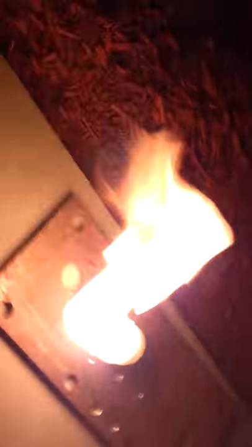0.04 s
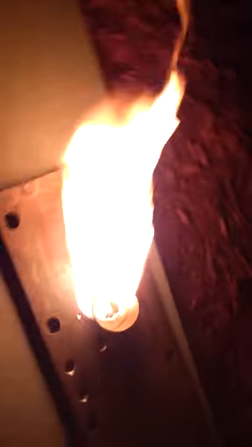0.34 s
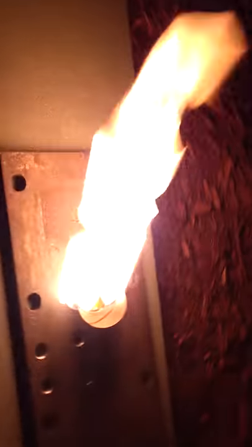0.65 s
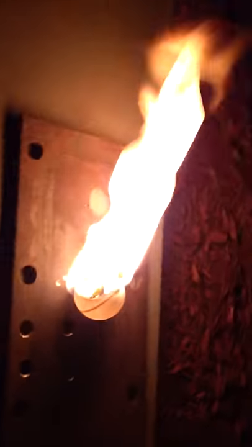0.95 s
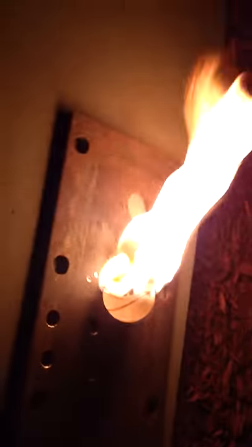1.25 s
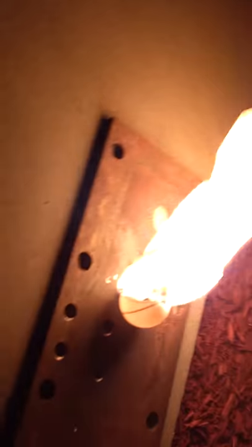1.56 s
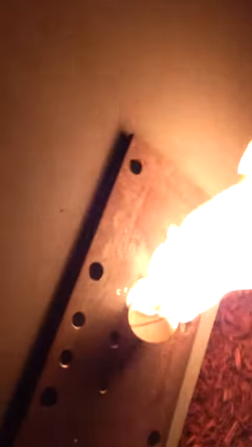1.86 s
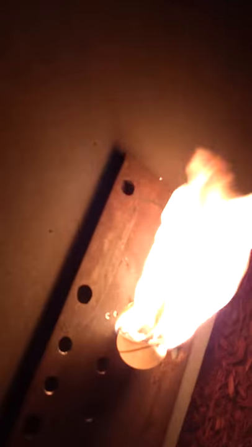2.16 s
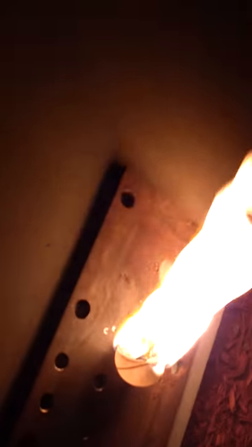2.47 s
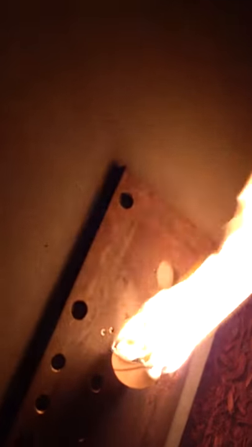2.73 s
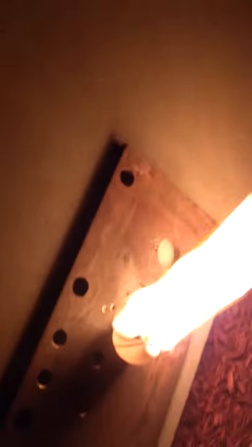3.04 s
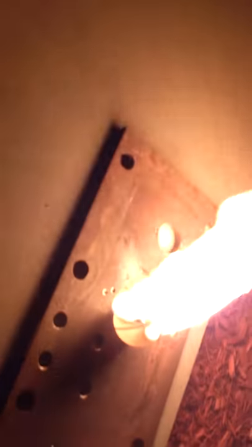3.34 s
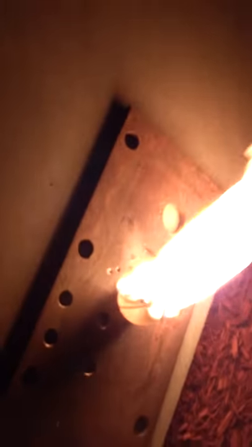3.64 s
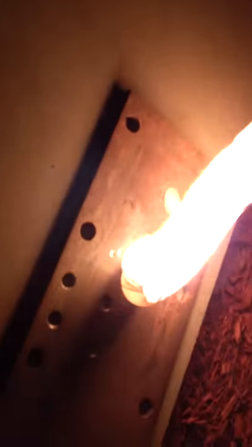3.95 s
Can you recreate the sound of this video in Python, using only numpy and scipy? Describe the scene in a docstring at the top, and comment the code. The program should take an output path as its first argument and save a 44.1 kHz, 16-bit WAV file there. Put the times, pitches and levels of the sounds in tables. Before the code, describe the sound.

A flame roars and hisses close up, with spitting crackles and a few handling knocks.

```python
"""Small ball burning on a board

Outdoors, close up: a fluttering roar and fine hiss over a low hum. Pockets of gas spit through the
first second, then the flame sinks and builds again with a faint whistle. A hand knocks and scuffs the
casing of the hand-held recorder, and something hollow and woody takes one padded blow. The recorder
widens its two close ports by feeding each, delayed and inverted, into the other side."""
import sys
import numpy as np
from scipy import signal
from scipy.fft import rfft, irfft
from scipy.io import wavfile

SR = 44100
rng = np.random.default_rng(int(sys.argv[2]) if len(sys.argv) > 2 else 0)


def dump(signal):
    """Clip the signal to [-1, 1] and save it as 16-bit WAV at the path in sys.argv[1]."""
    limited = np.clip(np.atleast_2d(signal).T, -1, 1)
    pcm = np.round(limited * 32767).astype(np.int16)
    wavfile.write(sys.argv[1], SR, pcm)


N = 176400
TIME = np.arange(N) / SR
FREQS = np.maximum(np.arange(N // 2 + 1) * SR / N, 1)
SIDES = np.array([[1], [-1]])  # left, right


def from_db(db):
    """Decibels to gain."""
    return 10 ** (np.asarray(db) / 20)


def unit_rms(x):
    """Scale to rms 1."""
    return x / np.sqrt(np.mean(x ** 2) + 1e-20)


def automation(rows):
    """One curve for each column after the time, at every sample."""
    times, *columns = np.transpose(rows)
    return [np.interp(TIME, times, column) for column in columns]


def over_freqs(points):
    """Draw a curve across the spectrum on a log-frequency axis."""
    hz, values = np.transpose(points)
    return np.interp(np.log(FREQS), np.log(hz), values)


def panned(db):
    """Stereo gains that put the left db above the right."""
    return from_db(.5 * SIDES * db)


def drift(rate_hz):
    """Smooth random modulator of rms 1."""
    return unit_rms(irfft(rfft(rng.standard_normal(N)) / (1 + (FREQS / rate_hz) ** 2), N))


def decay(t, t60):
    """One until time zero, then an exponential fall."""
    return np.exp(-np.log(1000) * np.clip(t / t60, 0, 10))


def ring(clicks, hz, t60):
    """A unit click sets a sine of height 1 ringing."""
    radius, angle = np.exp(-np.log(1000) / (t60 * SR)), 2 * np.pi * hz / SR
    return signal.lfilter([0, np.sin(angle)], [1, -2 * radius * np.cos(angle), radius ** 2], clicks + 1e-18)


def sharp_click(gains):
    """The shortest click with this spectrum, starting at time zero; energy 1."""
    cepstrum = irfft(np.log(gains + 1e-6), N)
    click = irfft(np.exp(rfft(2 * cepstrum[:N // 2], N)), N)
    return click / np.sqrt(np.sum(click ** 2))


def narrow_noise(hz, width_hz):
    """Noise in one resonance, which may glide; rms 1."""
    phase = 2 * np.pi * np.cumsum(hz * np.ones(N)) / SR
    return unit_rms(drift(width_hz) * np.cos(phase) + drift(width_hz) * np.sin(phase))


# Stereo focus of the noise: f/Hz, left-right correlation (clipped to +-1)
IMAGE_FOCUS = [(30, -0.5), (80, -0.47), (170, 2.4), (350, 0.5), (700, 0.5), (1300, -0.16), (2500, -0.09),
               (14000, 0)]
# Phase skew: f/Hz, left lead/rad
IMAGE_LEAD = [(30, -4), (70, -0.7), (150, -1), (350, 0.5), (700, -.5), (1300, -2.5), (3000, -0.5)]
# Balance: f/Hz, left minus right/dB
IMAGE_PAN = [(30, 7.5), (150, -12.5), (350, -4.5), (850, -2), (1550, -5.5), (2050, -4), (4000, 3.5),
             (8000, -2.5), (11000, -2.5), (14000, -7)]
def noise_spectrum(eq):
    """Spectrum of equalised noise with the flame's stereo image."""
    mid, side = rfft(rng.standard_normal((2, N)))
    focus = np.clip(over_freqs(IMAGE_FOCUS), -1, 1)
    pair = np.sqrt(1 + focus) * mid + np.sqrt(1 - focus) * side * SIDES
    skew = np.exp(.5j * SIDES * over_freqs(IMAGE_LEAD))
    return pair * from_db(over_freqs(eq)) * panned(over_freqs(IMAGE_PAN)) * skew


def turbulence(eq, flutter_db):
    """Noise whose ten octaves swell together and flutter apart; rms 1."""
    spectrum, swell, out = noise_spectrum(eq), drift(rate_hz=7.5), 0
    octave = np.clip(np.log2(FREQS / 32), 0, 9)
    for k in range(10):
        band = irfft(spectrum * np.maximum(1 - abs(octave - k), 0), N)
        out += band * from_db(flutter_db * (.5 * swell + drift(rate_hz=11.6)))
    return unit_rms(out)


# Fader ride of the roar, before trim: t/s, level/dB
ROAR_FADER = [(0, -34.5), (.19, -38.5), (.33, -34.5), (.52, -36.5), (.88, -35), (.99, -36.5), (1.07, -43.5),
              (1.4, -42), (1.8, -38), (2.4, -37.5), (3.1, -37), (3.55, -36), (4, -35.5)]
# Its dark tone: f/Hz, level/dB
ROAR_EQ = [(25, -3), (45, -11.5), (75, 5), (130, 0), (220, -1), (330, -4), (480, -2.5), (700, -1.5),
           (1000, -6), (1450, -12.5), (2000, -15), (2800, -32.5), (4500, -63), (16000, -64)]
def roar(trim_db=2.5):
    """The turbulent body of the flame sinks after a second and builds back."""
    return from_db(trim_db + automation(ROAR_FADER)[0]) * turbulence(ROAR_EQ, flutter_db=1)


# Fader ride of the hiss, before trim: t/s, level/dB
HISS_FADER = [(0.0, -48), (0.17, -51.5), (0.41, -51.5), (0.7, -53), (0.91, -47.5), (1.07, -57), (1.3, -58),
              (1.58, -57.5), (1.98, -53), (2.21, -54.5), (3.5, -54.5), (4.0, -53)]
# Its bright tone: f/Hz, level/dB
HISS_EQ = [(25, -41), (1500, -15.5), (2800, 7), (4000, -2.5), (5300, -4), (6700, -5.5), (9200, -5),
           (11000, -8.5), (15000, -15)]
def hiss(trim_db=3):
    """Fine turbulence gives the flame its top end, strongest in the first second."""
    return from_db(trim_db + automation(HISS_FADER)[0]) * turbulence(HISS_EQ, flutter_db=1.3)


# Two early surges of sizzle: t/s, level/dB
SIZZLE_FADER = [(0, -47), (.2, -48.5), (.3, -52.5), (.45, -78), (.7, -57), (.9, -48), (1.02, -53.5),
                (1.12, -57.5), (1.5, -70)]
def sizzle():
    """The flame sizzles in one narrow treble band, independent left and right."""
    band = np.array([narrow_noise(hz=3890, width_hz=720) for _ in range(2)])
    return from_db(automation(SIZZLE_FADER)[0]) * band


# Fader rides of the lower and upper hum tone, before trim: t/s, level/dB
LOW_HUM_FADER = [(0, -46.5), (.35, -41), (.58, -55), (.75, -38), (1.1, -54.5), (1.35, -47), (1.48, -39.5),
                 (1.8, -39), (2.02, -49), (2.3, -40), (2.6, -38), (2.8, -44), (3.0, -46.5), (3.2, -45.5),
                 (4, -42)]
HIGH_HUM_FADER = [(0, -42), (.2, -45), (.28, -37.5), (.45, -35), (.58, -46), (.7, -34), (.95, -36.5),
                  (1.1, -53.5), (1.3, -45.5), (1.55, -51.5), (2.08, -39.5), (2.55, -45), (2.9, -49.5),
                  (3.249, -43), (4, -54)]
# The two tones: f/Hz, pitch wander (twice its rms)/Hz, trim/dB, left lead/rad
HUM_VOICES = [(107.74, 3.94, 0.2, -1.27), (169.05, 3.45, 0.5, -0.89)]
def hum(waver_db=2.5):
    """Two low tones under the flame waver in pitch and level."""
    out = 0
    for (hz, wander_hz, trim_db, lead), fader in zip(HUM_VOICES, (LOW_HUM_FADER, HIGH_HUM_FADER)):
        phase = 2 * np.pi * np.cumsum(hz + .5 * wander_hz * drift(rate_hz=8.4)) / SR
        gain = from_db(trim_db + automation(fader)[0] + waver_db * drift(rate_hz=7.8))
        out += gain * np.sqrt(2) * np.sin(phase + np.array([[lead], [0]]))
    return out * panned(db=1)


# Spit cues: t/s, level/dB, hold/s, jet t60/s, snap level/dB, tilt above 1 kHz/(dB per octave),
# high cut/Hz, rings relative to jet/dB, left minus right/dB
SPIT_CUES = [(0.027, -29, 0.014, .06, -30, -14, 12000, -27, 6),
             (0.31, -35, 0.003, 0.046, -33, 5, 13000, -2.5, 3),
             (0.3434, -36.5, 0.0022, .02, -42, 1.5, 9000, -22, -8),
             (0.4014, -40, 0.00093, 0.015, -20, 3.5, 15000, -20, -2),
             (0.4028, -30, 0.0012, 0.04, -24.5, 2.5, 15000, -13, -5),
             (0.4848, -35, 0.0032, 0.021, -38, 5.5, 14000, 3, 3),
             (0.7705, -26.5, 0.0025, 0.017, -20.5, 0.5, 16000, -19, -3),
             (0.776, -42.5, 0.039, .08, -48, -6, 12000, -14, -4),
             (0.9535, -28.5, 0.015, 0.038, -24, 2.5, 16500, -29, -11.5),
             (0.9894, -33.5, 0.002, 0.046, -29, 3, 10000, -7, -6),
             (1.007, -36, .002, 0.034, -43, 8, 12500, -22, 1),
             (1.021, -35, 0.001, 0.017, -35, 1, 12000, -12, 6),
             (1.025, -29, 0.00093, 0.014, -22, 11, 9900, -4, 14),
             (1.0297, -35, 0.00081, 0.035, -24, 10, 10000, -3, -12),
             (1.053, -44, 0.0043, 0.028, -49, 4, 12000, -14, -7),
             (1.111, -42, 0.0028, 0.043, -42, -5, 9500, -14, -13)]
# Tone of jet and snap, before tilt: f/Hz, level/dB
SPIT_EQ = [(200, 12.5), (1000, -23), (1900, 22), (2900, 5.5), (4500, 8), (5500, 3), (6800, -1), (9200, -2),
           (10500, -5.5), (15000, -19)]
# Thin rings on top: f/Hz, width/Hz, relative level/dB
SPIT_RESONANCES = [(4500, 290, 3), (9370, 220, -11)]
def spits(grain_db=6.5, snap_s=0.00027, left_lag_s=0.000305):
    """Pockets of gas burst: a snap, right port first, a grainy jet that holds and dies, thin rings."""
    out, spectrum = np.zeros((2, N)), noise_spectrum(SPIT_EQ)
    rings = unit_rms(sum(from_db(db) * np.array([narrow_noise(hz, width_hz) for _ in range(2)])
                         for hz, width_hz, db in SPIT_RESONANCES))
    grain = unit_rms(from_db(grain_db * drift(rate_hz=1100)))
    for onset, db, hold, t60, snap_db, tilt_db, cut_hz, ring_db, pan_db in SPIT_CUES:
        start, release = int(onset * SR), TIME - onset - hold
        tilt = from_db(tilt_db * np.log2(np.maximum(FREQS / 1000, 1)))
        tone = tilt / np.sqrt(1 + (FREQS / cut_hz) ** 20)
        jet = unit_rms(irfft(spectrum * tone, N)) * grain * decay(release, t60)
        body = from_db(db) * (jet + from_db(ring_db) * rings * decay(release, t60=0.041))
        click = np.sqrt(snap_s * SR) * sharp_click(tone * from_db(over_freqs(SPIT_EQ)))
        snap = from_db(snap_db) * np.array([np.interp(TIME - left_lag_s, TIME, click, left=0), click])
        out[:, start:] += panned(pan_db) * (body[:, start:] + snap[:, :N - start])
    return out


# Knock cues: t/s, ring level/dB, ring length factor, emphasis/Hz, fall either side/(dB per octave),
# thump level/dB, crack level/dB, tail level/dB, difference between the ports (0-1)
KNOCK_CUES = [(0.0276, -10.5, 0.4, 1300, 5.5, -35, -37, -43, 0),
              (0.0998, 1.5, 0.42, 1180, 3, -13, -19, -41, 0.57),
              (0.282, -25.5, 2.9, 900, 11, -45, -50, -32.5, 0.1),
              (0.382, -29, 1.6, 750, 5, -45, -50, -33, 0.4), (.983, -21, 1.6, 1300, 5.5, -13, -45, -45, 0),
              (1.526, -34, 0.31, 1190, -8, -45, -50, -56, .1),
              (3.8562, 1, 0.45, 1680, 11, -1.5, -23, -55, 0.36)]
# Modes of the casing: f/Hz, relative level/dB, t60 before the length factor/s
CASING_MODES = [(396, -4.5, 0.033), (468, -5.5, 0.036), (754, 0.5, 0.012), (960, -2.5, 0.016),
                (1203, -4, .014), (1546, -10.5, 0.016), (1820, -14, 0.011), (4020, -45, 0.00099),
                (7360, -27, 0.0042)]
# Tone of the hollow tail: f/Hz, level/dB
TAIL_EQ = [(100, -36), (340, 4), (550, 9), (800, -2), (1100, 3.5), (1500, -11), (2500, -41), (8000, -67)]
def casing_knocks(thump_delay_s=0.0015, thump_centre=0.18, crack_top_hz=3950):
    """The hand hits the casing: a crack, ringing modes, a low thump and a short hollow tail."""
    out, t = np.zeros((2, N)), TIME[:SR // 8]
    click, hollow = signal.unit_impulse(len(t)), unit_rms(irfft(noise_spectrum(TAIL_EQ), N))
    thump = ring(signal.unit_impulse(len(t), int(thump_delay_s * SR)), hz=149, t60=0.025)
    thump = thump * (thump_centre - SIDES)  # the two ports rock against each other
    for onset, db, length, emphasis_hz, fall_db, thump_db, crack_db, tail_db, apart in KNOCK_CUES:
        start, body = int(onset * SR), 0
        for k, (hz, mode_db, t60) in enumerate(CASING_MODES):
            gain = from_db(db + mode_db - fall_db * abs(np.log2(hz / emphasis_hz)) + rng.normal(0, 1))
            ports = 1 - apart * SIDES * (-1) ** (k // 2)
            body += (-1) ** k * gain * ports * ring(click, hz, t60 * length)
        burst = rng.standard_normal((2, len(t))) * decay(t, t60=0.0034)
        crack = signal.lfilter(*signal.butter(1, crack_top_hz, fs=SR), burst)
        hit = body + from_db(thump_db) * thump + from_db(crack_db) * crack
        out[:, start:start + len(t)] += hit[:, :N - start]
        out += from_db(tail_db) * hollow * (TIME >= onset) * decay(TIME - onset, t60=0.16)
    return out


# Scuff cues: peak t/s, level/dB, bell width (sigma)/s
SCUFF_CUES = [(0.034, -35.5, 0.01), (0.969, -30.5, 0.011), (3.577, -37, 0.011), (3.635, -37.5, 0.0076),
              (3.651, -33, 0.0084), (3.782, -41, 0.016)]
# Their soft, mid-forward tone: f/Hz, level/dB
SCUFF_EQ = [(100, -8), (700, -4), (1350, 9), (2100, -0.5), (3100, 1), (3700, -4.5), (4300, -4),
            (5500, -8.5), (9000, -18), (15000, -23)]
def scuffs(grain_db=0.5):
    """Skin slides on the casing in short, lightly grainy swells."""
    swells = sum(from_db(db) * np.exp(-.5 * ((TIME - peak) / width) ** 2)
                 for peak, db, width in SCUFF_CUES)
    friction = irfft(noise_spectrum(SCUFF_EQ), N)
    return swells * unit_rms(friction * from_db(grain_db * drift(rate_hz=810)))


# Blow and light rebound: t/s, level/dB
HOLLOW_CUES = [(0.8269, -20), (0.8373, -31)]
# Woody modes: f/Hz, relative level/dB, t60/s
WOODY_MODES = [(356, -4, 0.098), (407, -8, 0.074), (746, -7, 0.068), (840, -6, 0.1), (924, 8, 0.018),
               (1015, -6, 0.073), (1120, -10, 0.053), (1350, 0.5, .012), (1590, -11, 0.0083)]
def hollow_knock(spread_s=0.00051, top_hz=2600):
    """A padded blow bounces on something hollow and woody; its modes set in slightly apart."""
    out = np.zeros(N)
    for onset, db in HOLLOW_CUES:
        for hz, mode_db, t60 in WOODY_MODES:
            start = int((onset + spread_s * rng.random()) * SR)
            out += from_db(db + mode_db) * ring(signal.unit_impulse(N, start), hz, t60)
    return signal.lfilter(*signal.butter(2, top_hz, fs=SR), out) * panned(db=0.5)


# Glide and fade of the whistle: t/s, f/Hz, level/dB
WHISTLE_GLIDE = [(2.31, 1630, -84), (2.39, 1569, -49.5), (2.64, 1550, -49), (2.74, 1545, -64),
                 (2.82, 1575, -54), (3.2, 1408, -52), (3.35, 1417, -73)]
def whistle():
    """A faint breathy whistle in the flame sinks in pitch, far to the right."""
    hz, db = automation(WHISTLE_GLIDE)
    return from_db(db) * narrow_noise(hz, width_hz=95) * panned(db=-20)


def scene():
    """A bed of flame and hum, with spits and handling on top."""
    flame = roar() + hiss() + sizzle() + whistle()
    return flame + hum() + spits() + casing_knocks() + hollow_knock() + scuffs()


def record(dry):
    """The recorder widens the image between bass and top treble, rounds peaks and trims both ends."""
    crossfeed, delay_s, from_hz, to_hz = 0.71, 0.000396, 810, 11100
    low_cut_hz, high_cut_hz = 65, 15700
    spectrum = rfft(dry)
    share = crossfeed * (1 - np.exp(-(FREQS / from_hz) ** 2)) / (1 + (FREQS / to_hz) ** 4)
    other_port = np.exp(-2j * np.pi * FREQS * delay_s) * spectrum[::-1]
    wide = irfft((spectrum - share * other_port) / np.sqrt(1 + share ** 2), N)
    rounded = 0.64 * np.tanh(wide / 0.65)
    thinned = signal.sosfilt(signal.butter(2, low_cut_hz, "high", fs=SR, output="sos"), rounded)
    return signal.sosfilt(signal.ellip(10, .1, 80, high_cut_hz, fs=SR, output="sos"), thinned)


dry = scene()
out = record(dry)
dump(out)
```